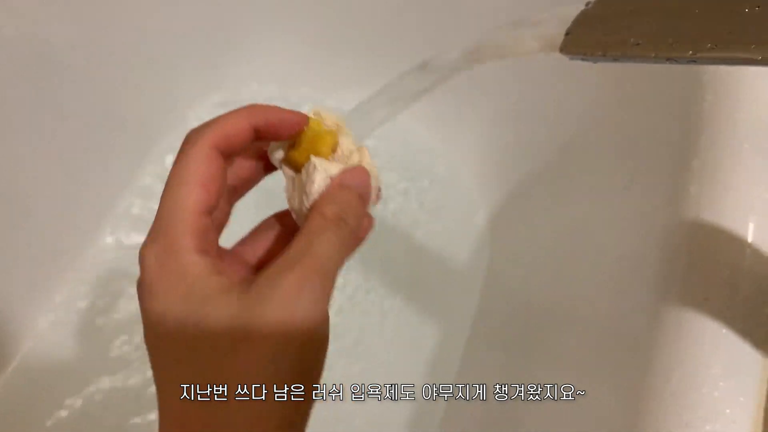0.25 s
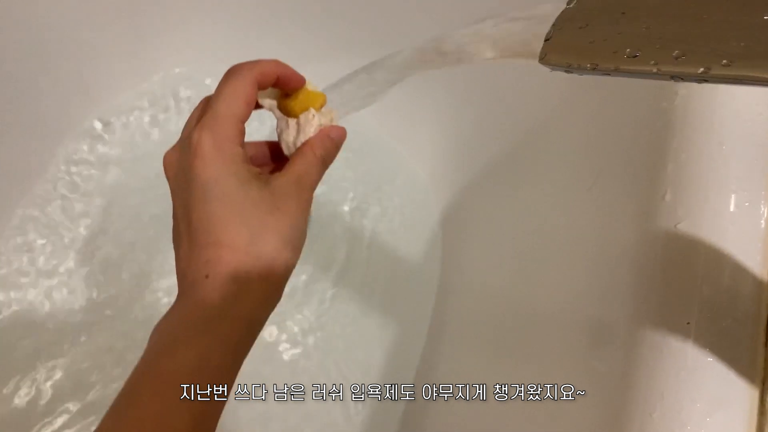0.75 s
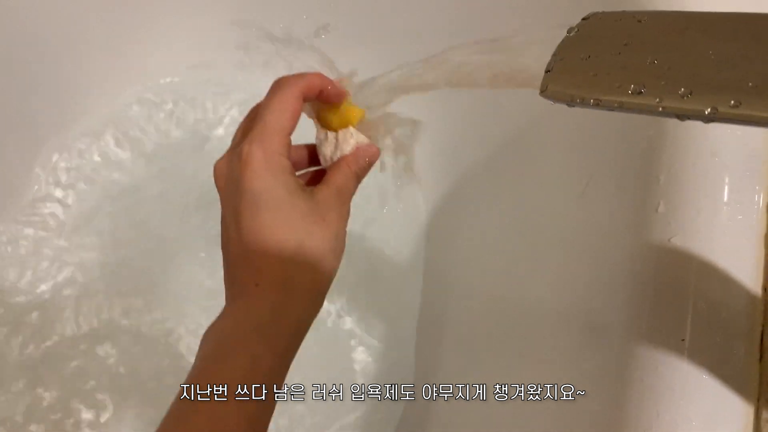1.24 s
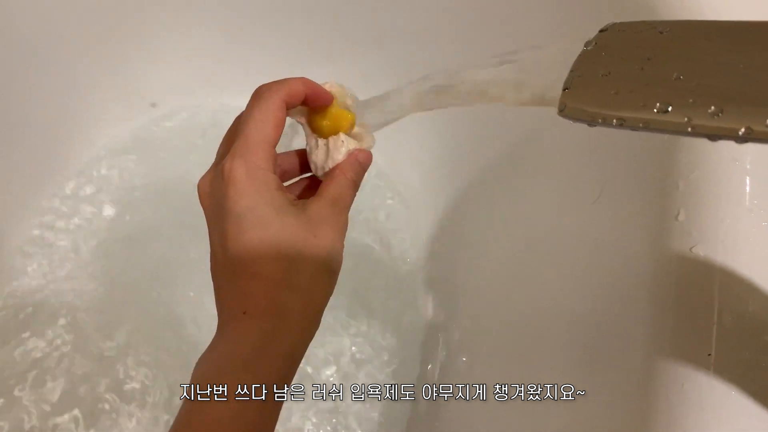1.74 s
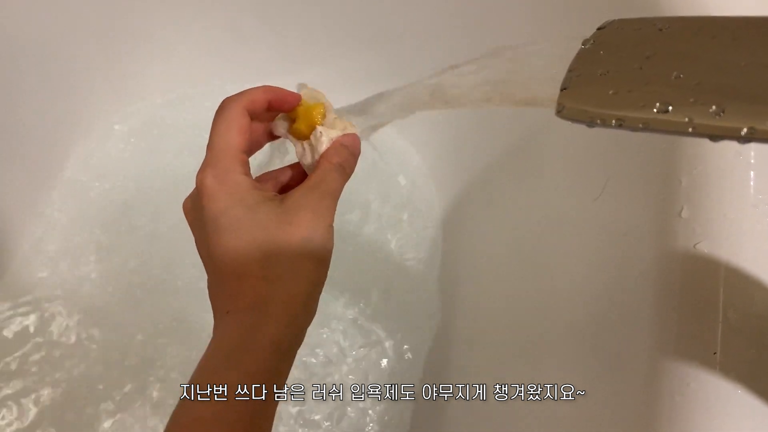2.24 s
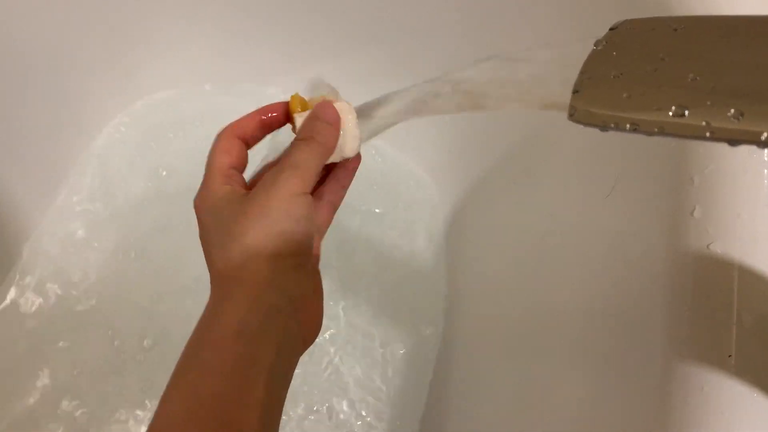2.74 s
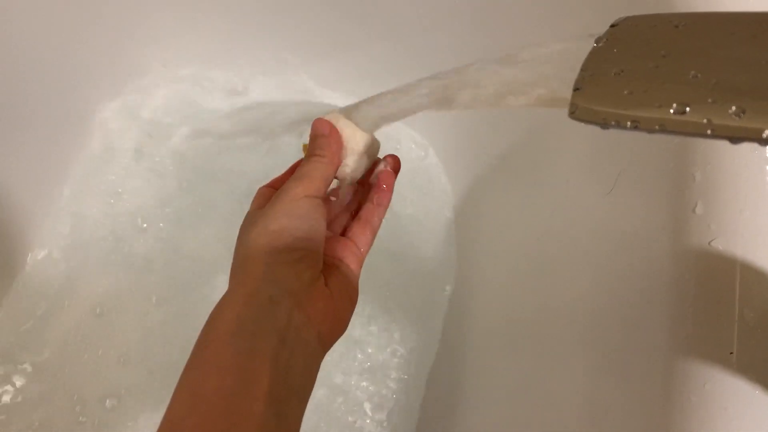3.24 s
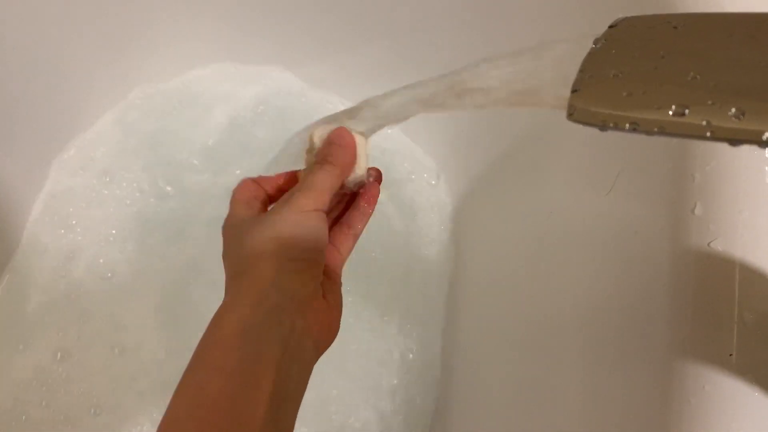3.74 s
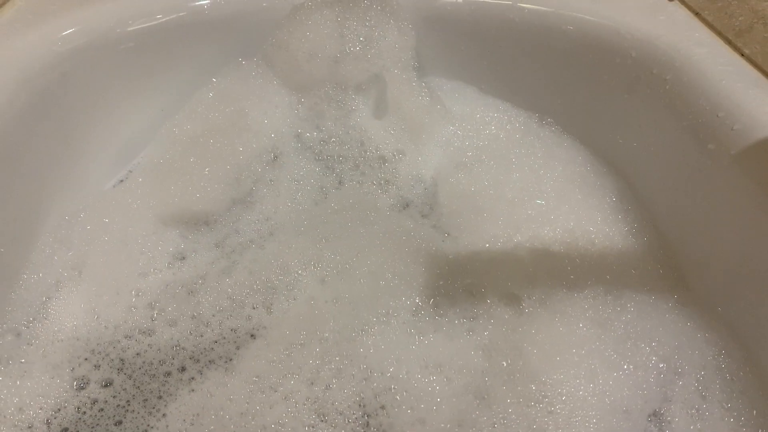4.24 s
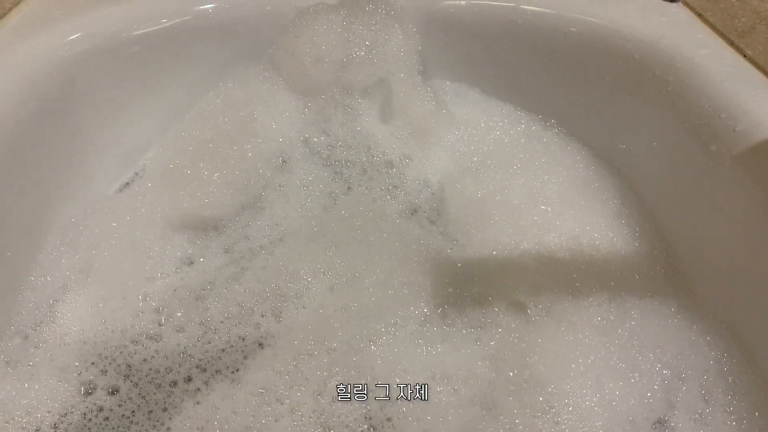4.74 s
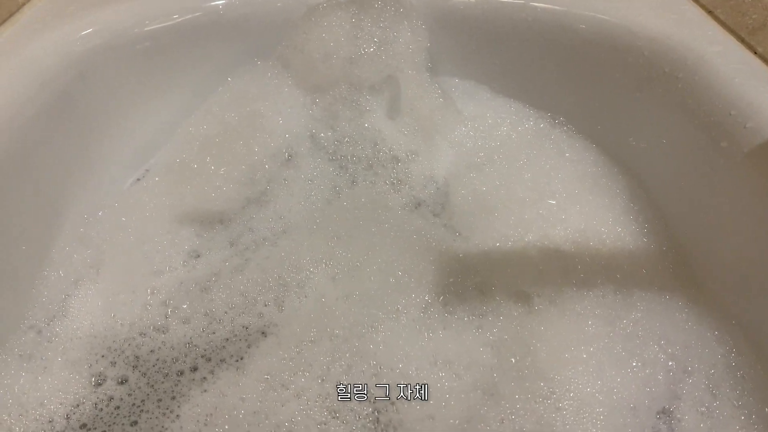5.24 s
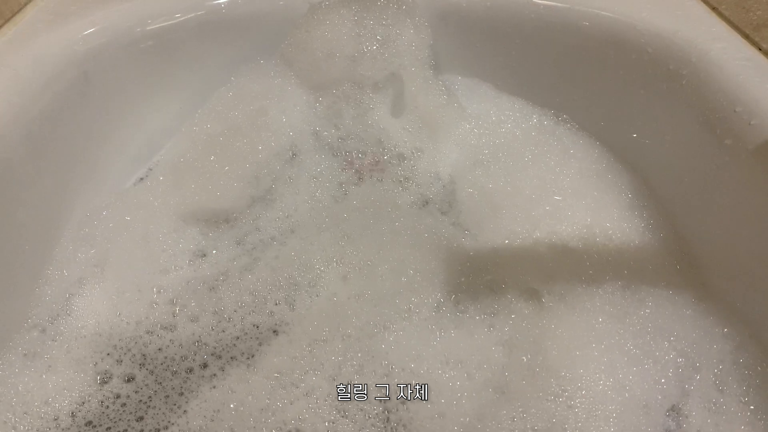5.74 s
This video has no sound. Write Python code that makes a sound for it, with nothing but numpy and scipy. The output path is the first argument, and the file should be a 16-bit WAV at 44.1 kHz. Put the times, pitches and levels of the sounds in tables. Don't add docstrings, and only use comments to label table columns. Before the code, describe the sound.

Close stereo microphones at arm's length from a bathtub in a tiled room. A flat stream of tap water breaks on a hand and plunges into the tub, a dense splashy rush with low gurgles, plops, sharp splats and bright ticks. Near four seconds it cuts hard to near silence: soft rumble, a faint pump hum, tiny foam pops and fizz, then one weak pipe squeak.

```python
import sys
import numpy as np
from scipy import signal
from scipy.fft import rfft, irfft, next_fast_len
from scipy.io import wavfile
from scipy.ndimage import uniform_filter1d

SR = 44100
rng = np.random.default_rng(int(sys.argv[2]) if len(sys.argv) > 2 else 0)


def log_audio(samples):
    frames = np.atleast_2d(samples).T
    limited = np.clip(frames, -1, 1)
    pcm = np.round(limited * 32767).astype(np.int16)
    wavfile.write(sys.argv[1], SR, pcm)


def invert_db(x):
    u = np.asarray(x, float) / 20
    return 10 ** u


N = 263982
CUT_S, RESUME_S = 3.9765, 4.0005

# time_s, force_db, fanning_db (spread on the hand), pocket_hz (air pocket under it)
FLOW = [(0.0, -33, -1, 295), (0.6, -34, 0, 290), (1.0, -33, 0.5, 270), (1.28, -32.5, -0.5, 255),
        (1.36, -30.5, 1.5, 275), (1.48, -32, 4, 270), (1.54, -30.5, 3.5, 440), (1.64, -28.5, 4, 400),
        (1.82, -28.5, 0, 440), (2.02, -28.5, -1, 234), (2.35, -29.5, -3.5, 245), (2.75, -34, 1.5, 258),
        (3.0, -29, -2.5, 260), (3.16, -31, 6, 276), (3.28, -31.5, 5, 453), (3.6, -30.5, -0.5, 375),
        (3.76, -31, 3.5, 426), (3.97, -30.5, 0, 290)]
# level_db at mean force, force_share, fanning_share
LAYERS = [
    (-44.5, 0.43, -.3),
    (-41.5, 0.33, -0.99),
    (-30.5, 1, 0.038),
    (-31.5, 0.98, 0.89),
]
LAYER_HZ = [100, 320, 1500, 6000]
# pitch_hz, level_db per band
RUSH_COLOUR = [(25, -16.5), (40, -35.5), (65, -14), (100, -11), (155, -10), (220, -11.5), (450, -11.5),
               (700, -12.5), (1100, -6), (1700, -10), (2700, -3), (5000, -2.5), (9000, -4.5),
               (13500, -12.5), (14900, -12.5), (15700, -18.5)]
# pitch_hz, bubbles_per_s in a band, bubble_share (0-1), ring_cycles, flicker_db, largest_db
GRAIN = [(61, 44, 0.34, 24, 0.5, 13.5), (301.3, 70, 0.4, 20, 0.1, 14), (1405, 130, .7, 41, 0.9, 12.5),
         (2804, 220, .6, 40, 1, 9), (5190, 500, .5, 20, 1.26, 8.5), (11460, 1100, 0.8, 12, 0.5, 9)]
# start_s, length_s, lift_db, pitch_hz
CHURNS = [(.18, .03, 4, 303), (.9, .1, 5, 271.2), (1.03, .17, 3.5, 290), (1.34, 0.07, 3.5, 1600),
          (1.72, .14, -2, 1200), (2.4, .1, -4, 1700), (2.25, .1, -2.5, 250), (3.15, 0.13, -3, 1300),
          (1.84, .05, -3.5, 540), (1.5, 0.03, 8.5, 1312), (1.55, 0.047, 6.5, 415), (1.85, 0.065, 1.5, 1700),
          (2.17, 0.068, 6.5, 1200), (2.5, 0.094, 5.5, 1780), (2.795, 0.075, 5, 1450), (2.88, 0.074, 6, 240),
          (2.94, .04, 1, 1800), (3.326, .05, 4.5, 1280), (3.36, 0.39, -5, 210), (3.5, .15, 1.5, 1500),
          (3.79, .05, 1, 1400), (3.81, .06, -1, 330), (0.16, 0.27, 2.5, 2920), (0.47, .28, 0, 2700),
          (.93, 0.28, 0.5, 2800), (2.03, 0.047, 2, 2880), (2.2, 0.2, -3, 1600), (2.6, 0.11, 3.5, 2500),
          (2.6, 0.16, 1, 4400), (3.33, .06, 1.5, 1900), (3.3, 0.12, 3, 780), (3.5, 0.069, -1, 3100),
          (3.0, 0.034, 3.5, 2000), (3.07, .1, 1.5, 1700), (1.7, .2, 3, 2200), (3.86, .1, -2, 4300),
          (1.45, .2, 2, 4100), (.25, .2, 2.5, 1200), (.03, .07, 0.5, 2600)]
BAND_EDGES = 22 * 2 ** np.arange(0, 9.7, 1 / 3)
MEAN_FORCE_DB, SPLASH_HZ = -30.5, 1650


def rush():
    force_db, fanning_db, pocket_hz = in_time(FLOW)
    layers_db = [db + a * (force_db - MEAN_FORCE_DB) + b * fanning_db for db, a, b in LAYERS]
    out, white = 0, rng.standard_normal((2, N))
    gurgle = np.log2(pocket_hz)
    splash = np.log2(SPLASH_HZ) + 0.11 * drift(2.7)
    churn_db = bursts(CHURNS, attack_s=0.012, release_s=0.034, octaves=0.62)
    surge, near, spatter = drift(6.1), drift(15), drift(90)
    any_size = invert_db(4.3 * rng.exponential(1, N))
    for k, (low, high) in enumerate(zip(BAND_EDGES, BAND_EDGES[1:])):
        hz = np.sqrt(low * high)
        per_s, share, cycles, flicker_db, largest_db = at_hz(GRAIN, hz)
        share = np.clip(share, 0, 1)
        near = 0.5 * near + 0.63 * drift(21)

        sizes = np.minimum(any_size, invert_db(largest_db))
        draw = rng.random(N) * SR / per_s
        small = sizes * (draw < 0.5)
        large = sizes * (draw < 1) * (draw >= 0.5)
        bubbles = ring(small, hz * 1.058, cycles / hz) - ring(large, hz * 0.942, cycles / hz)
        turbulence = rms_one(band(white[k % 2], low, high))
        water = np.sqrt(1 - share) * turbulence + np.sqrt(share) * rms_one(bubbles)

        level_db = blend(layers_db, LAYER_HZ, hz) + at_hz(RUSH_COLOUR, hz)[0] + churn_db(hz)
        level_db = level_db + flicker_db * (0.6 * surge + 1.4 * near + 1.3 * spatter * (hz > 3000))
        if 130 < hz < 3500:
            level_db = level_db + 8.94 * np.exp(-((np.log2(hz) - gurgle) / 0.56) ** 2)
            level_db = level_db + 4 * np.exp(-((np.log2(hz) - splash) / 0.28) ** 2)
        out = out + water * invert_db(level_db)
    return out


# start_s, peak_db, pitch_hz, t60_s
GULPS = [(0.431, -17, 282, 0.054), (0.603, -27.5, 248, 0.1), (0.889, -15.5, 337, 0.053),
         (0.958, -23.5, 241.7, 0.16), (1.549, -19, 464, 0.1), (1.798, -28, 458, 0.076),
         (1.879, -23.5, 336, 0.084), (1.997, -20.5, 226, 0.11), (2.1, -21.5, 220, 0.05),
         (2.179, -15.5, 763, 0.036), (2.389, -17, 252, 0.039), (2.569, -23, 223.5, 0.094),
         (2.874, -23.5, 232, 0.11), (2.979, -21, 184, 0.11), (3.355, -19, 452, 0.059),
         (3.53, -26, 347, 0.11), (3.629, -19, 336, 0.059), (3.771, -22, 1014, 0.071),
         (3.815, -16, 323.5, 0.072), (1.656, -19, 1170, 0.045), (1.906, -20, 910, 0.031),
         (3.025, -23.5, 907, 0.028), (3.36, -22.5, 810, 0.036), (3.455, -21, 1140, 0.031),
         (3.568, -19, 1140, 0.028), (3.636, -22, 1150, .025), (3.695, -16, 800, 0.028)]
# start_s, peak_db, pitch_hz, t60_s
PLOPS = [(0.156, -20, 1580, 0.012), (0.242, -24.5, 2220, 0.02), (0.523, -12, 2560, 0.016),
         (0.772, -21, 1630, 0.034), (0.936, -20.5, 1450, 0.022), (1.025, -16.5, 4270, 0.034),
         (1.089, -15.5, 1620, 0.018), (1.375, -14.5, 1600, 0.02), (1.462, -15, 2430, 0.016),
         (1.906, -13.5, 1680, 0.018), (2.059, -13, 1730, 0.015), (2.167, -5, 1860, 0.011),
         (2.37, -23, 1450, 0.013), (2.604, -19, 1740, 0.0075), (2.794, -18.5, 1700, 0.022),
         (2.842, -12, 1410, 0.023), (2.909, -17, 1690, 0.012), (2.806, -17.5, 1320, .02),
         (2.859, -17.5, 1420, .015), (2.872, -17.5, 1400, .015), (2.575, -18, 1760, .02),
         (3.283, -18.5, 1480, .012), (1.548, -17.5, 1270, .02), (3.3136, -10.5, 1240, 0.015),
         (3.3298, -7.5, 1410, 0.0073), (3.508, -15, 1650, 0.02), (3.625, -15.5, 1500, 0.0192),
         (3.651, -15.5, 1608, 0.02), (3.692, -11, 1400, 0.011), (3.808, -13.5, 1450, 0.015)]
# start_s, peak_db, pitch_hz, t60_s
SPLATS = [(0.526, -21.5, 2440, 0.008), (1.0256, -16, 4250, 0.0088), (1.329, -15.5, 7920, 0.0086),
          (1.339, -16, 7900, 0.008), (1.489, -8.5, 4184, 0.0046), (1.5856, -18.5, 8290, 0.004),
          (2.5273, -11.5, 2700, 0.0066), (2.6217, -7, 2578, 0.0051), (2.938, -14, 2618, 0.0099),
          (3.393, -22.5, 8600, 0.008), (.188, -16, 6100, .005), (.378, -14, 3330, 0.0091),
          (.4605, -17, 5650, .005), (.4855, -11.5, 4500, 0.0069), (.537, -15, 5400, 0.0095),
          (.961, -20, 2050, .008), (.993, -20, 2710, .01), (1.025, -15.5, 2796, 0.0093),
          (1.2585, -16, 5490, 0.0045), (1.411, -19, 3020, 0.0074), (1.618, -14.5, 3045, 0.0055),
          (1.880, -14, 2380, 0.0099), (2.059, -16, 2760, 0.0087), (2.419, -17, 2503, .008),
          (2.452, -19, 2790, 0.0066), (2.5715, -17.5, 5330, .005), (2.623, -8.5, 4850, 0.0045),
          (2.6235, -14, 3000, 0.011), (2.8225, -15, 3060, .008), (2.908, -16, 4100, 0.0067),
          (2.9205, -14, 5470, 0.0049), (3.013, -17, 6240, 0.0036), (3.131, -17, 2390, .008),
          (3.329, -14, 2036, .007), (3.540, -15, 2116, 0.0087), (3.6925, -11.5, 2037, .007),
          (3.697, -15, 2790, 0.0074)]
# start_s, peak_db, pitch_hz
TICKS = [(.187, -18.5, 7540), (0.5234, -12.5, 6460), (0.5258, -18.5, 7000), (.5395, -15.5, 8890),
         (0.773, -17, 8380), (0.817, -14, 7180), (0.889, -13, 6980), (1.0697, -16, 7340),
         (1.218, -20.5, 7600), (1.3158, -10, 8100), (1.3818, -17, 8940), (1.4122, -9, 8100),
         (1.5153, -21.5, 8000), (1.761, -13.5, 8090), (1.9975, -11.5, 8210), (2.167, -11, 5930),
         (2.4151, -14, 8190), (2.4406, -15, 8400), (2.4942, -23.5, 8490), (2.526, -13.5, 8810),
         (2.813, -22.5, 8900), (2.8638, -18, 8150), (2.92, -9, 8100), (3.209, -12.5, 9200),
         (3.6334, -18.5, 8210), (3.6951, -18, 8350), (3.7234, -13.5, 8000), (1.6096, -15, 8000),
         (1.6994, -15, 8100)]


def drops():
    gulps = sum(bubble(s, db + 0.5, hz, t60, rise=0.04, onset=3.2) for s, db, hz, t60 in GULPS)
    plops = sum(bubble(s, db + 0.33, hz, t60, rise=0.028, onset=0.2) for s, db, hz, t60 in PLOPS)
    splats = sum(bubble(s, db + 1.5, hz, t60, rise=0.064, onset=0.35) for s, db, hz, t60 in SPLATS)
    ticks = sum(bubble(s, db + 1.0, hz, 0.0055, rise=0.23, onset=0.3) for s, db, hz in TICKS)
    return gulps + plops + splats + ticks


# pitch_hz, width_hz, level_db
TUB = [(63.4, 12, 4.5), (93.5, 9.4, 9.5), (202.4, 4, 8.5), (229.5, 6, 0.5), (249.1, 6, 6.5),
       (293.2, 7.3, 0.5), (347, 4.1, 9), (453.6, 16, 1), (484.7, 6.5, 6), (558.4, 5.9, 9.5), (631, 5.3, 7),
       (788, 13, 3), (930, 10, 2), (1017, 10, -1), (1309, 16, -3.5), (1390, 8, 2), (1707, 14, 3),
       (1774, 9, 3.5), (2500, 14, -1.5), (4010, 30, -5.5), (2736, 210, -8), (4300, 150, -20)]


def tub(x):
    return x + resonate(x, TUB)


def tiles(x, room_t60_s=0.21):
    hz, frames, z = signal.stft(x, SR, nperseg=512)
    keep = invert_db(-120 * 256 / SR / room_t60_s)
    power = np.abs(z) ** 2
    settled = np.mean(power[:, :20], axis=1, keepdims=True)
    lingering = signal.lfilter([0, 1 - keep], [1, -keep], power, zi=settled)[0]
    noise = signal.stft(rng.standard_normal((2, N)), SR, nperseg=512)[2]
    return signal.istft(np.sqrt(lingering) * noise / np.std(noise), SR, nperseg=512)[1][:, :N]


# pitch_hz, right_lead_rad, direct_share (0-1), left_minus_right_db
PORTS = [(30, 0, .8, .4), (250, .25, .97, -2.8), (500, .9, .8, -3), (800, 2.7, .3, -3.5),
         (1200, 3.8, .15, -3), (1700, 5.0, .65, -.6), (2150, 4.0, .25, -.6), (2500, 3.35, .7, -1.5),
         (3100, 3.3, .85, -1), (4000, 4.4, .72, .1), (4950, 3.14, .82, .3), (8300, 0, .95, .1),
         (12850, -3.14, .95, .1), (15500, -6.28, .7, .1)]
PORT_LAG_S = 1 / 8300


def ports(wide, near):
    size = next_fast_len(N + SR)
    hz = np.fft.rfftfreq(size, 1 / SR)
    f, *columns = np.transpose(PORTS)
    lead, direct, tilt_db = [np.interp(hz, f, c) for c in columns]
    direct = np.clip(direct, 0, 1)
    side = np.array([[-0.5], [0.5]])
    straight = np.sqrt(direct) * rfft(wide, size) * np.exp(1j * side * lead)
    straight += rfft(near, size) * np.exp(-2j * np.pi * side * hz * PORT_LAG_S)
    scattered = np.sqrt(1 - direct) * rfft(tiles(wide + invert_db(1.5) * near), size)
    resonances = rfft(tub(np.eye(1, SR)[0]), size)
    return irfft((straight + scattered) * resonances * invert_db(-side * tilt_db), size)[:, :N]


# start_s, peak_db, pitch_hz, left_minus_right_db
POPS = [(4.065, -72, 572, -0.5), (4.148, -59, 647, 0.5), (4.312, -64, 592, -1.0), (4.38, -66, 646, 2.0),
        (4.549, -60, 652, -0.5), (4.583, -59.5, 651, -2.0), (4.693, -62, 546, 0.5), (4.721, -60, 573, 0.5),
        (4.746, -64, 576, -1.0), (4.797, -64, 651, 1.5), (5.072, -61, 536, -1.0), (5.298, -65, 595, 3.0),
        (5.927, -61, 539, 4.5)]
# start_s, peak_db, pitch_hz
SNAPS = [(4.087, -72, 1370), (4.138, -70, 2100), (4.149, -63, 2600), (4.1486, -62, 1200),
         (4.582, -68, 1950), (5.63, -68, 750), (4.622, -69, 2700), (4.7103, -63, 2000), (4.7978, -70, 3310),
         (5.043, -72, 4280), (5.201, -68, 4110), (5.203, -67, 4900), (5.2262, -66, 4870),
         (5.2266, -70, 8500), (5.739, -68, 5520), (5.725, -72, 4090), (4.8201, -71, 4230),
         (5.6133, -73, 4540), (5.935, -69, 4540), (5.62, -73, 2096), (5.834, -68, 2184), (5.937, -64, 1444)]


def foam():
    out = sum(bubble(s, db, hz, 0.0064, rise=0.1, onset=0.4) for s, db, hz in SNAPS)
    for s, db, hz, pan_db in POPS:
        pop = bubble(s, db + 4.0, hz, 0.03, rise=0.11, onset=0.29)
        snap_db = db + 1.2 * (db + 61) + 1.5
        snap = bubble(s, snap_db, 1500, 0.0028, rise=0.1, onset=0.35)
        out = out + (pop + snap) * invert_db(np.array([[pan_db / 2], [-pan_db / 2]]))
    return out


# time_s, pitch_hz, level_db
SQUEAK = [
    (5.592, 1120, -80),
    (5.612, 1105, -66),
    (5.66, 1105, -70),
    (5.69, 1107, -75),
    (5.72, 1066, -72),
    (5.8, 1050, -78),
    (5.87, 1030, -88),
]


def squeak():
    hz, level_db = uniform_filter1d(in_time(SQUEAK), size=600)
    start, end = SQUEAK[0][0], SQUEAK[-1][0]
    gate = np.interp(np.arange(N) / SR, [start, start + 0.023, end - 0.03, end], [0, 1, 1, 0])
    turn = 2 * np.pi * np.cumsum(hz * (1 + 0.0197 * drift(70))) / SR
    breath = drift(90) * np.sin(turn) + drift(90) * np.cos(turn)
    tone = 0.6 * np.sin(turn) + 0.4 * breath
    tremble = 1.0 + 0.12 * drift(60) + 0.23 * drift(200)
    return gate * tone * tremble * invert_db(level_db + 6.5) * invert_db([[-1.5], [1.5]])


CALM = [-58, -69, -88.5, -91.5]
CALM_HZ = [60, 400, 2000, 5000]
# pitch_hz, level_db per band
STILL_COLOUR = [(25, -2.5), (40, -11), (65, -13), (105, -1), (200, -6.5), (400, -9.5), (800, -6.5),
                (1300, -10), (2600, -4), (4500, -1), (7000, -3.5), (9000, 15), (11500, -5), (15000, -22)]
# pitch_hz, likeness (-1 to 1)
STILL_ALIKE = [(60, 0.38), (180, -0.38), (550, -0.065), (1650, -0.035), (4970, -0.05), (15000, 0.22)]
# start_s, length_s, lift_db, pitch_hz
FIZZES = [(4.71, 0.33, 9.5, 1450), (4.71, .15, 4, 2200), (4, .19, 5.5, 1900), (4.81, 0.1, 9, 4300),
          (5.2, .02, 14, 4300), (5.215, .035, 6, 440), (5.728, .04, 10, 4700), (5.728, .03, 7, 6900),
          (5.785, .19, 11, 1740), (5.93, .055, 9, 4700), (5.1, 0.8, 4, 27), (4.15, .1, 4, 1750),
          (5.2, .13, 7, 2100), (4.88, .16, 5, 2200), (5.93, .05, 6, 2800), (5.8, .06, 5, 5020),
          (4.95, .12, 3, 4400), (6, 0.07, 10, 1900), (5.6, 0.3, 3, 620), (5.24, 0.043, 3, 5600),
          (5.46, .1, 5, 1000), (5.42, 0.12, -7, 650), (4.2, .16, -5, 350), (5.66, .07, 9, 1300),
          (6.4, .07, 5, 860), (4.2, .33, -4, 1050), (4.2, .2, -4, 130), (5.25, .2, -3, 130),
          (5.36, .2, -4, 300)]
# pitch_hz, width_hz, level_db
WALLS = [(150.5, 8.9, 1.5), (255, 13, 2), (394, 14, 0), (650, 20, 0)]
HISS_DB = -96.5
HUM_HZ, HUM_WIDTH_HZ, HUM_DB = 103.8, 3.7, -65


def stillness():
    out, white = 0, rng.standard_normal((2, 2, N))
    fizz_db = bursts(FIZZES, attack_s=0.008, release_s=0.06, octaves=0.45)
    crackle = drift(150)
    stir = drift(16)
    first = int(RESUME_S * SR) - SR // 2
    for k, (low, high) in enumerate(zip(BAND_EDGES, BAND_EDGES[1:])):
        hz = np.sqrt(low * high)
        mid, side = band(white[k % 2, :, first:], low, high) / np.sqrt((high - low) * 2 / SR)
        alike = np.clip(at_hz(STILL_ALIKE, hz)[0], -1, 1)
        pair = np.sqrt(1 + alike) * mid + np.sqrt(1 - alike) * side * [[1], [-1]]
        if hz < 7000:
            steady_db = blend(CALM, CALM_HZ, hz) + 1.5 * drift(10.6) + 2.2 * stir * (150 < hz < 1100)
        else:
            steady_db = HISS_DB
        level_db = fizz_db(hz) * (1 + 0.21 * crackle) + steady_db
        out = out + pair * invert_db(level_db[first:] + at_hz(STILL_COLOUR, hz)[0])
    out = out + resonate(out, WALLS)
    hum = signal.lfilter(*signal.iirpeak(HUM_HZ, HUM_HZ / HUM_WIDTH_HZ, fs=SR), white[0, 0, first:])
    out = out + invert_db(HUM_DB) * rms_one(hum)
    return np.pad(out * invert_db([[-1.9], [-0.1]]), ((0, 0), (first, 0)))


def rumble(level_db=-63.5):
    noise = rng.standard_normal((2, N)) * [[1], [0.3]]
    mid, side = invert_db(level_db) * rms_one(band(band(noise, 21, 30), 20, 31))
    return mid + side * [[1], [-1]]


def bubble(s, peak_db, hz, t60, rise, onset):
    t = np.arange(int(max(t60, 0.002) * SR)) / SR
    out, at = np.zeros(N + len(t)), round(s * SR)
    shape = invert_db(peak_db - 60 * t / t60) * (1 - np.exp(-t * hz / onset))
    out[at:at + len(t)] = shape * np.sin(2 * np.pi * hz * (t + rise * t ** 2 / t60))
    return out[:N]


def ring(clicks, hz, t60):
    r, w = invert_db(-60 / (t60 * SR)), 2 * np.pi * hz / SR
    return signal.lfilter([1, 0, -1], [1, -2 * r * np.cos(w), r * r], clicks + 1e-18)


def resonate(x, rows):
    return sum(invert_db(db) * signal.lfilter(*signal.iirpeak(hz, hz / width, fs=SR), x) for hz, width, db in rows)


def bursts(rows, attack_s, release_s, octaves):
    t = np.arange(0, N, 32) / SR
    shapes = []
    for s, length, db, _ in rows:
        corners = [s - attack_s, s, s + length, s + length + release_s]
        shapes.append(db * np.interp(t, corners, [0, 1, 1, 0]))
    shapes, pitches = np.array(shapes), np.array(rows)[:, 3]

    def lift_db(hz):
        nearness = np.exp(-(np.log2(hz / pitches) / octaves) ** 2)
        return np.repeat(nearness @ shapes, 32)[:N]
    return lift_db


def drift(rate):
    r = np.exp(-80 * np.pi * rate / SR)
    slow = signal.lfilter([1], [1, -2 * r, r * r], rng.standard_normal(N // 40 + 2002))[2000:]
    return np.interp(np.arange(N) / 40, np.arange(len(slow)), rms_one(slow))


def in_time(rows):
    s, *columns = np.transpose(rows)
    return np.array([np.interp(np.arange(N) / SR, s, c) for c in columns])


def at_hz(rows, hz):
    f, *columns = np.transpose(rows)
    return [np.interp(np.log(hz), np.log(f), c) for c in columns]


def blend(curves, centres, hz):
    place = np.interp(np.log(hz), np.log(centres), np.arange(len(centres)))
    k = min(int(place), len(centres) - 2)
    return curves[k] + (place - k) * (curves[k + 1] - curves[k])


def rms_one(x):
    return x / np.sqrt(np.mean(x ** 2) + 1e-20)


def band(x, low, high):
    return signal.sosfilt(signal.butter(2, [low, high], "band", fs=SR, output="sos"), x)


def scene():
    t = np.arange(N) / SR
    fade_db = np.interp(t, [CUT_S - 0.0015, CUT_S, CUT_S + 0.015, CUT_S + 0.016], [0, -38, -55, -120])
    water = signal.sosfilt(signal.butter(4, 58, "high", fs=SR, output="sos"), ports(rush(), drops()))
    tap = water + rumble()
    dull = signal.sosfilt(signal.butter(2, 2500, fs=SR, output="sos"), tap)
    tap = np.where(t < CUT_S, tap, dull) * invert_db(fade_db)
    return tap + (stillness() + foam() + squeak()) * np.clip((t - RESUME_S) / 0.001, 0, 1)


THIN_BANDS = [96, 108, 120, 132, 144, 160, 176, 196, 216, 240, 264, 292, *range(320, 800, 32)]
# pitch_hz, spared_db
SPARED = [(13000, 0), (13700, 0), (13900, 3), (15100, 3), (15300, -2.5), (16000, -2.5)]
SHARP_HITS = [.519, .775, 1.312, 1.332, 2.166, 2.42, 2.925]


def thin_stereo(dry, margin_db, wobble_db, faint_db):
    pair = np.array([dry[0] + dry[1], dry[0] - dry[1]]) / 2
    hz, frames, z = signal.stft(pair, SR, nperseg=2048)
    kept = np.ones(z.shape)
    loud_db = 10 * np.log10(np.mean(np.abs(z[:, 140:510]) ** 2, axis=(0, 1)) + 1e-24)
    faint_db = faint_db + 0.61 * (loud_db + 66.5)
    spared_db = np.interp(hz, *np.transpose(SPARED))
    for low, high in zip(THIN_BANDS, THIN_BANDS[1:]):
        power = np.mean(np.abs(z[:, low:high]) ** 2, axis=1) + 1e-24
        spread_db = wobble_db * (1 + 0.9 * (10900 < hz[low] < 13700))
        gap_db = 10 * np.log10(power / power[::-1]) + spread_db * rng.standard_normal(power.shape)
        if hz[low] < 7000:
            gap_db = gap_db + 5 * uniform_filter1d(rng.standard_normal(power.shape), size=5) + 1.5
        floor_db = faint_db - spared_db[low + 16] - 4 + 2 * rng.standard_normal(power.shape)
        too_faint = (10 * np.log10(power) < floor_db) & (hz[low] > 11000)
        dropped = too_faint | (gap_db < -margin_db - 4 * (hz[low] < 7000))
        kept[:, low:high] = ~dropped[:, None]
    line_floor = invert_db(faint_db - np.maximum(spared_db, 0)[:, None])
    kept *= (np.abs(z) > line_floor) | (hz < 11000)[:, None]
    kept[:, :, np.abs(frames - RESUME_S - 0.02) < 0.035] = 1
    mid, side = signal.istft(z * np.maximum(kept, invert_db(-60)), SR, nperseg=2048)[1][:, :N]

    to_hit_s = np.min(np.abs(np.arange(0, N, 32)[:, None] / SR - SHARP_HITS), axis=1)
    whole = 0.55 * np.repeat(np.clip((0.011 - to_hit_s) / 0.004, 0, 1), 32)[:N]
    whole[int((CUT_S - 0.006) * SR):int((RESUME_S + 0.03) * SR)] = 1
    return whole * dry + (1 - whole) * np.array([mid + side, mid - side])


def top_cut(x):
    return signal.sosfilt(signal.butter(12, 16470, fs=SR, output="sos"), x)


def record(dry):
    dry = signal.sosfilt(signal.cheby2(24, 60, 16100, fs=SR, output="sos"), dry)
    mix = thin_stereo(dry, margin_db=7.6, wobble_db=1.6, faint_db=-74)
    return top_cut(mix)


dry = scene()
out = record(dry)
log_audio(out)
```